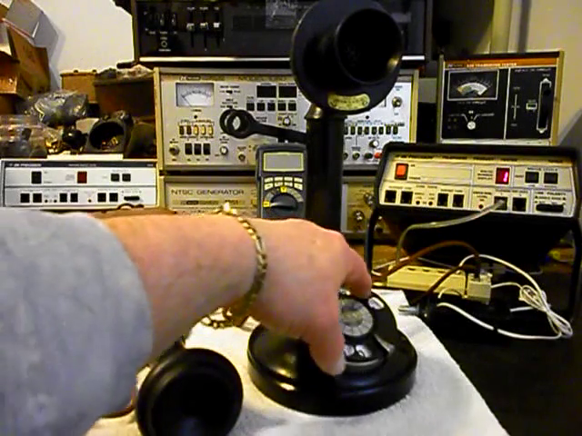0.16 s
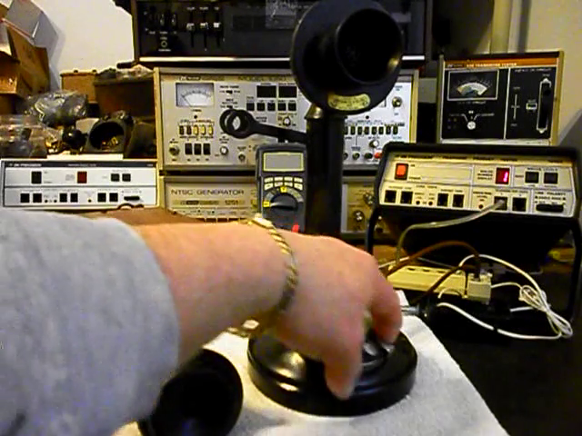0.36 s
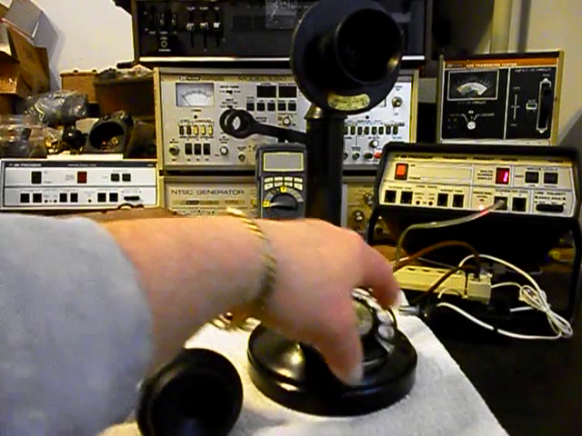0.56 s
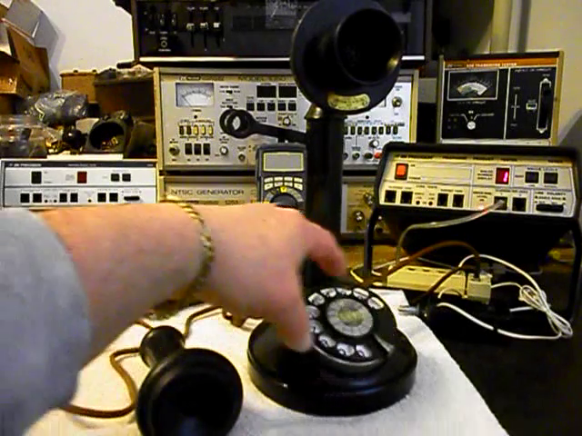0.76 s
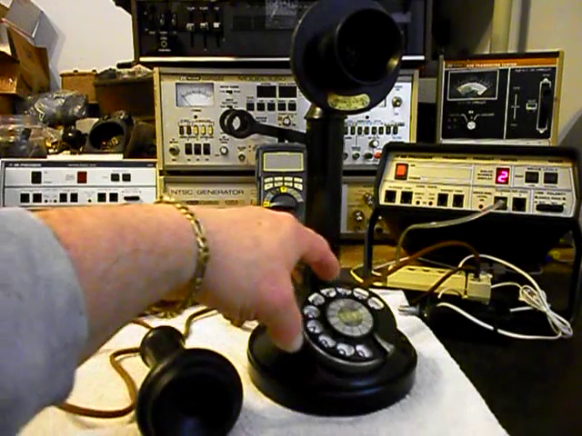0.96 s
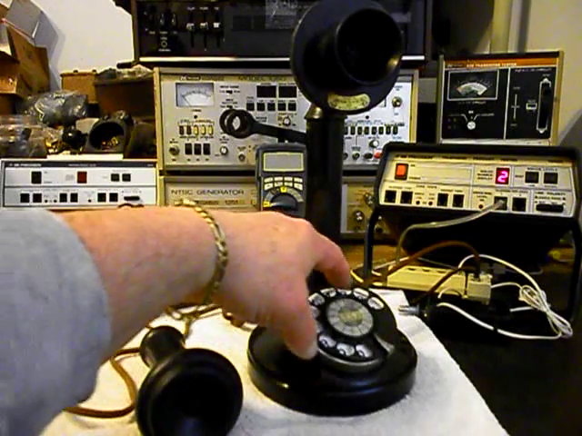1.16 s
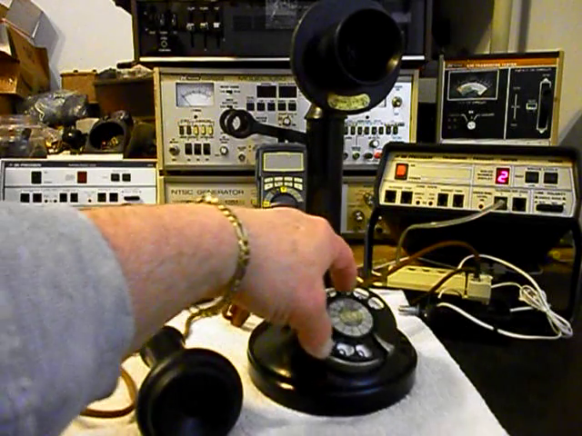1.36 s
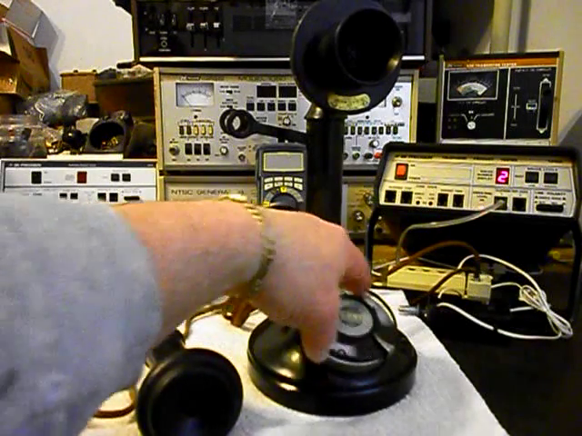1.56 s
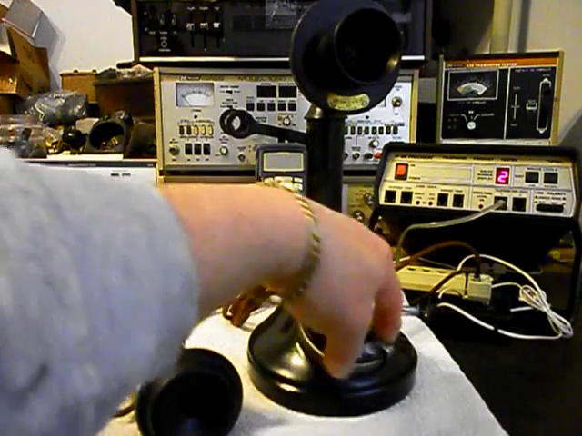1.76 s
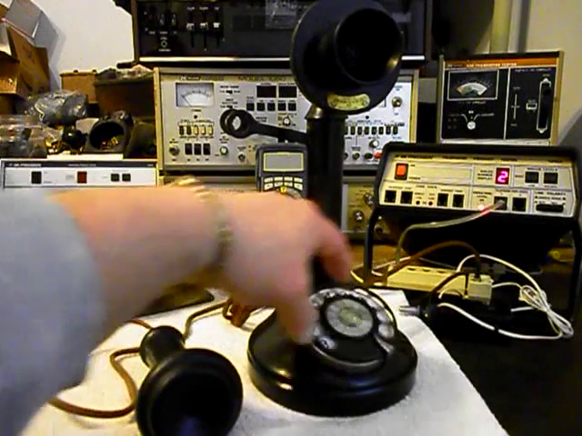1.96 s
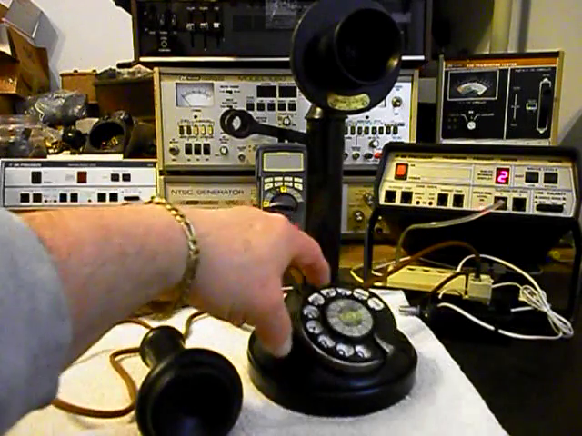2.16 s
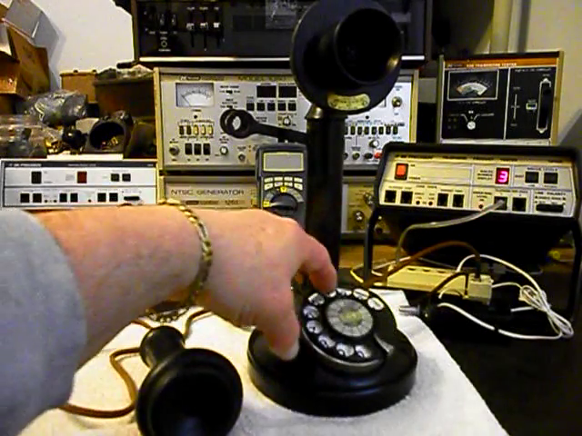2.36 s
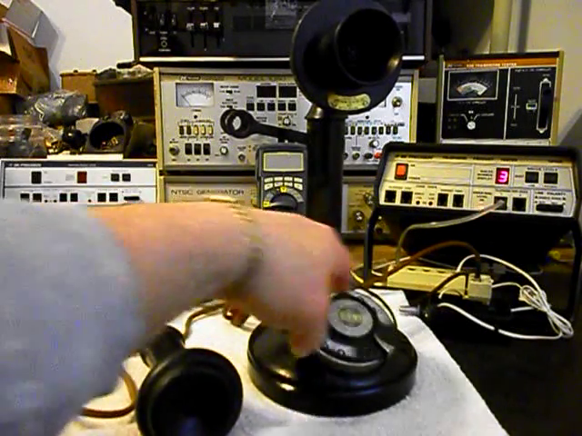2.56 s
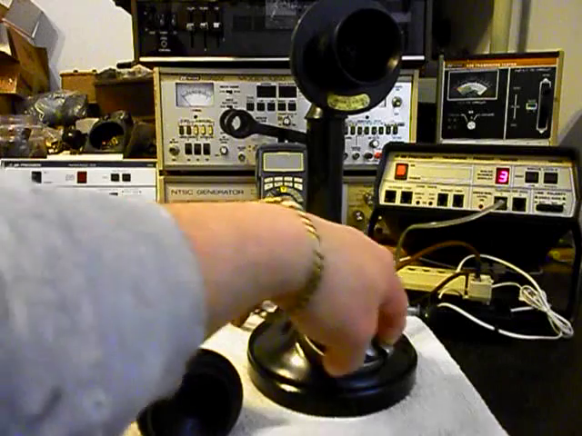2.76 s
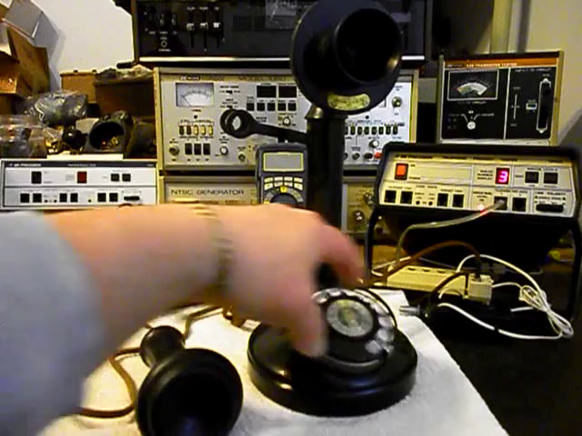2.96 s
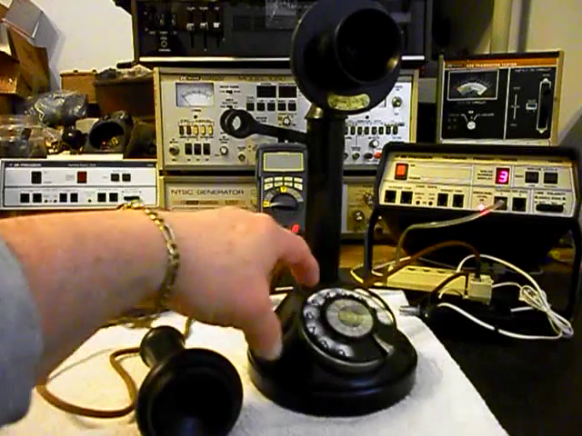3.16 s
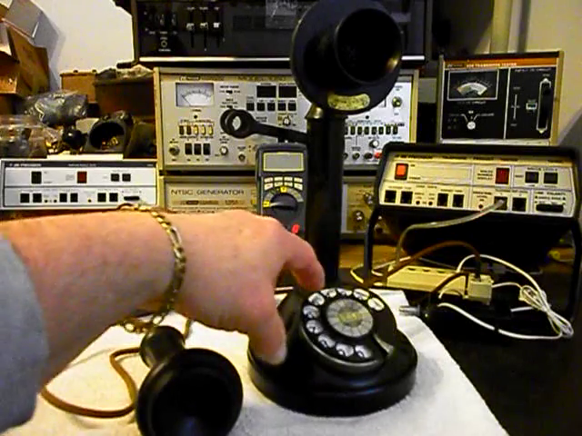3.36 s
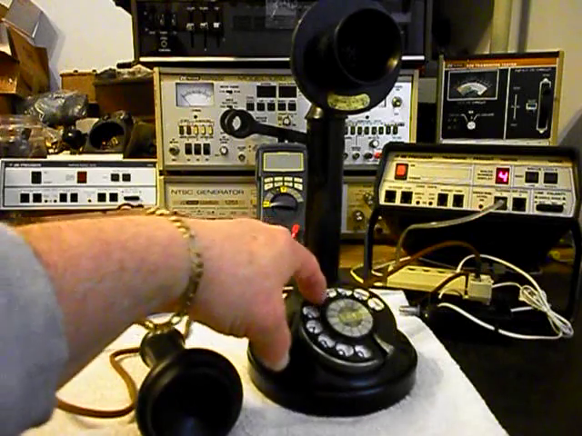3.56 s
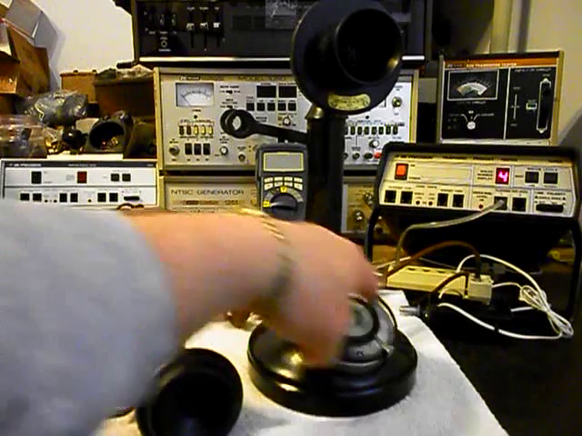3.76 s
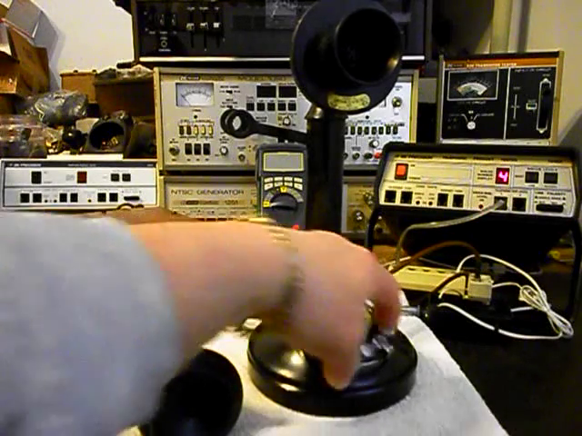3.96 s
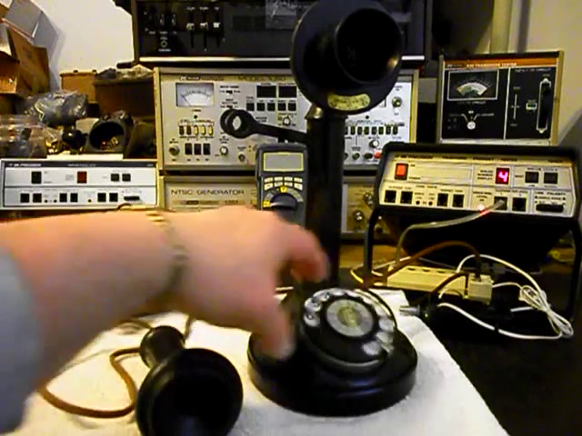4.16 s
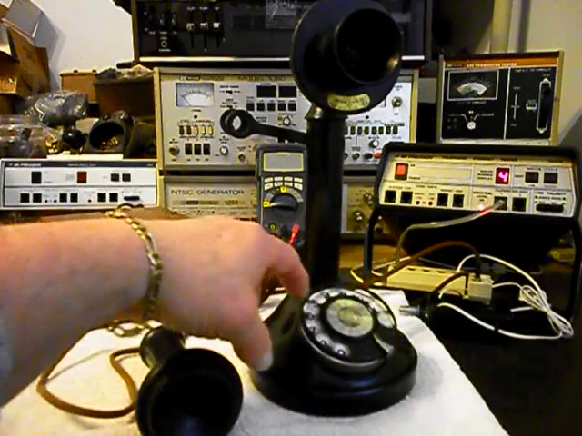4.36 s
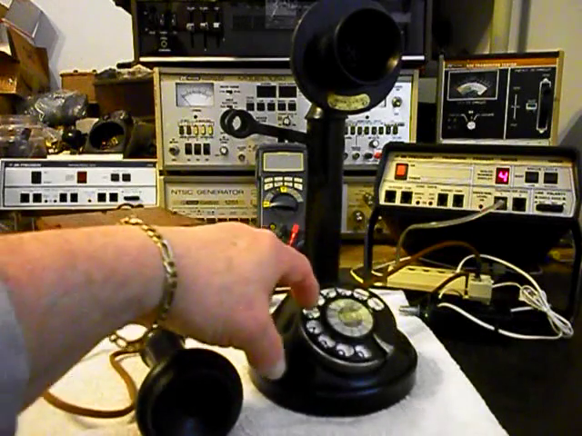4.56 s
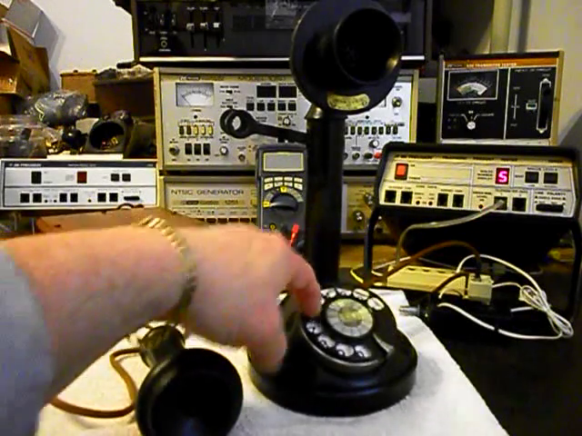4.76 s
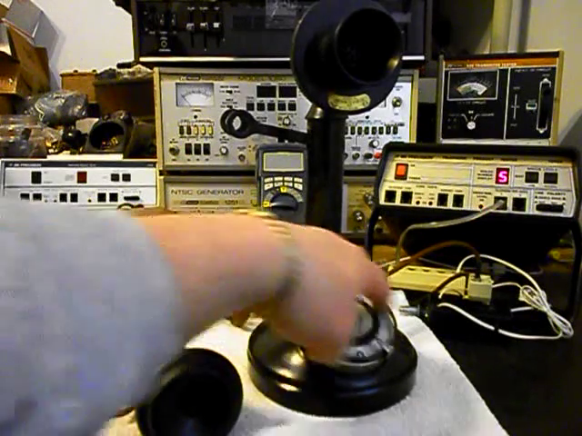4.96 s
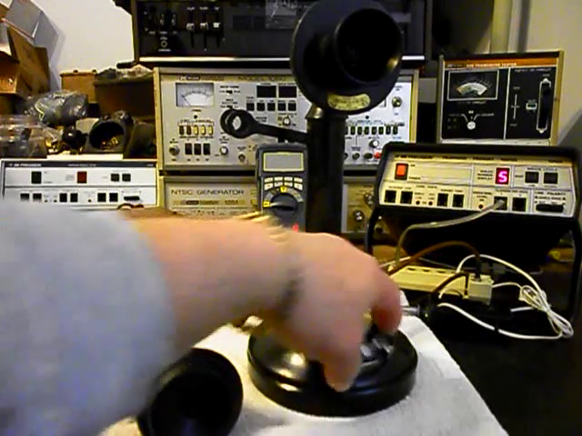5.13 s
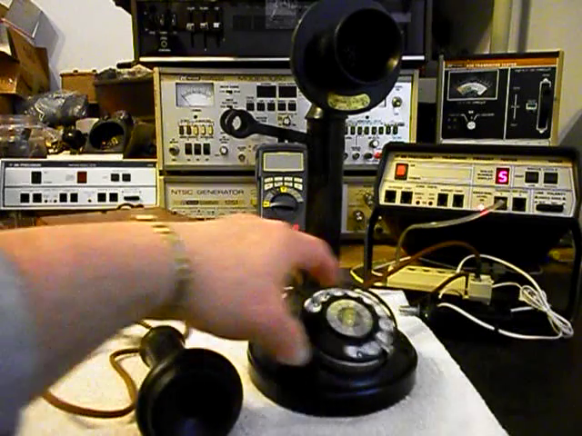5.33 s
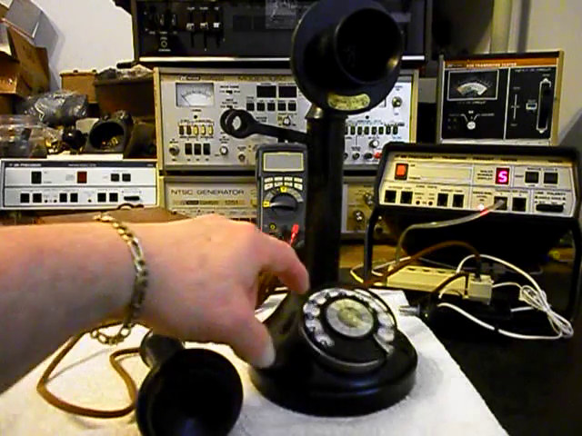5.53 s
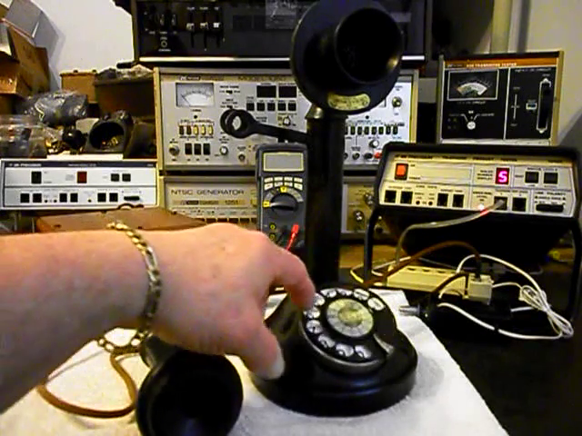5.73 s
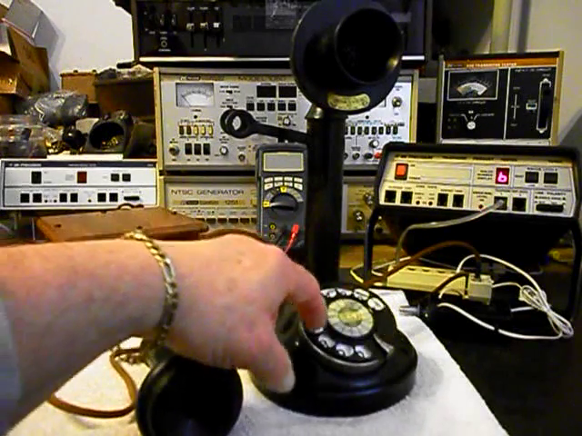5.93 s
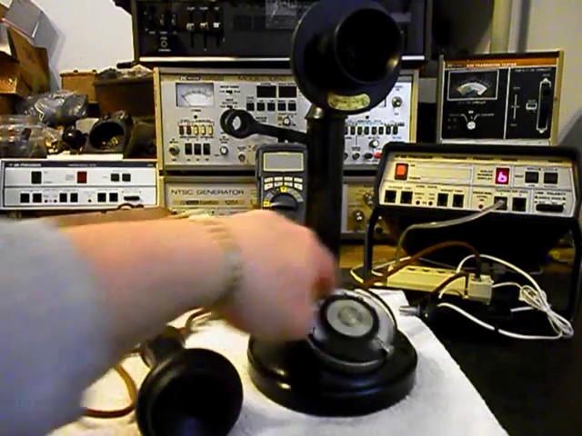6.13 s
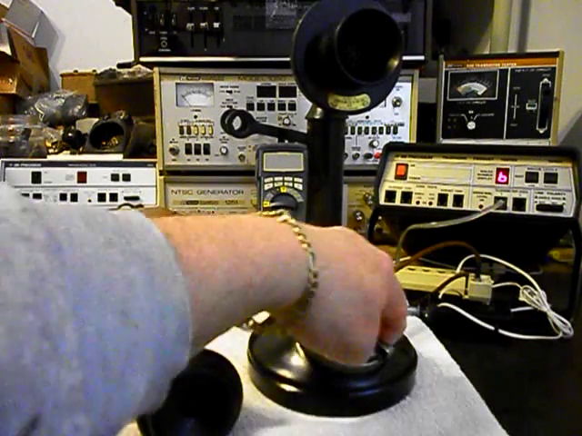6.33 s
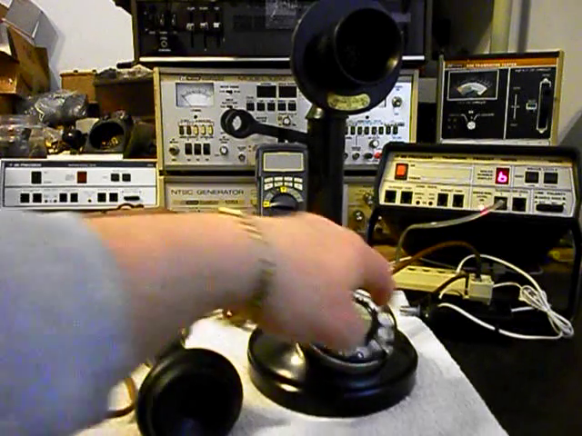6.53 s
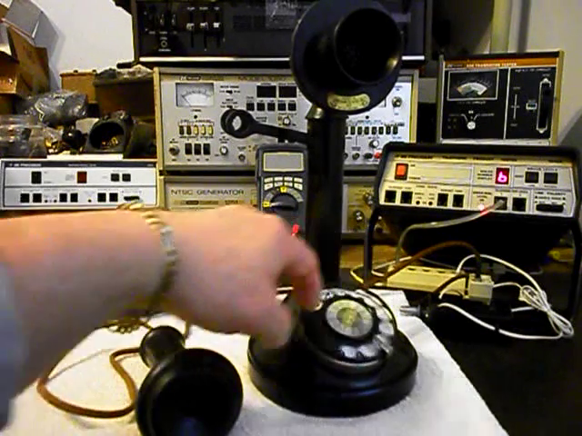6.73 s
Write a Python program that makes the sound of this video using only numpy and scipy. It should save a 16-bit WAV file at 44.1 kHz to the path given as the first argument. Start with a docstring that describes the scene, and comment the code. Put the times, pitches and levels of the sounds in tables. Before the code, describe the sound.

A metal rotary telephone dial is wound with ratchety ticks and released six times, clacking loudly, whirring back and snapping to its stop.

```python
"""A bench in a quiet workshop: a finger winds an old metal telephone dial and lets it run back, six times.
Winding: two contact springs snap as rung impulses, then a pawl ticks over the ratchet as struck plate modes.
Release: a bouncing clack, gears whirring as toothed noise, springs snapping back, the wheel hitting its stop;
the sixth run is still whirring at the end. The hand brushes, knocks and rocks the base; a small camera listens."""
import sys
import numpy as np
from scipy import signal
from scipy.fft import rfft, irfft
from scipy.io import wavfile
from scipy.ndimage import uniform_filter1d

SR = 44100
rng = np.random.default_rng(int(sys.argv[2]) if len(sys.argv) > 2 else 0)


def master_out(mix):
    """Clip the mix to full scale and print it as 16-bit PCM to the path in sys.argv[1]."""
    frames = np.transpose(np.atleast_2d(mix))
    ceiling = np.clip(frames, -1, 1)
    pcm = np.round(ceiling * 32767).astype(np.int16)
    wavfile.write(sys.argv[1], SR, pcm)


def convert_level_to_amplitude(level_db):
    """Map a level in decibels to its linear amplitude factor."""
    exponent = np.asarray(level_db, float) / 20
    return 10 ** exponent


N = 299439  # samples

# room air and hiss, relative spectrum: hz, density_db_per_hz
AIR_SPECTRUM = [(18, -62.5), (30, -25.5), (91, -16.5), (108, -8), (145, -15.5), (175, -9.5), (756, -17.5),
                (1660, -21), (1830, -22), (3040, -25), (7700, -32.5), (10000, -64), (16900, -120)]
# room decay: hz, t60_s
ROOM_DECAY = [(250, 0.6), (1000, 0.39), (3500, 0.46), (7000, 0.32)]
# bench top answering a push of the hand: start_s, peak_db
BENCH_PUSHES = [(0.33, -58), (1.211, -62), (1.644, -68.5), (2.68, -49), (3.799, -62), (5.003, -56.5),
                (5.97, -58), (6.248, -61)]
# low thuds as the recorder overloads: start_s, peak_db
LOW_CLIP_THUDS = [(0.471, -31.5), (1.775, -31.5), (2.699, -35), (3.949, -25.5), (5.963, -44), (6.48, -34)]
# a push rocks the base on its cloth: start_s, length_s, top_db
ROCKING_PUSHES = [(2.705, 0.11, -36.5), (5.05, 0.096, -44.5)]
# base modes: hz, width_hz, relative_db
BASE_MODES = [(306, 53, -1.5), (385, 16, -2), (630, 220, -13.5)]
# hand brushing base and cloth: start_s, length_s, final_db
HAND_BRUSHES = [(0.125, 0.16, -58), (1.199, .36, -58.5), (2.331, 0.27, -56), (3.404, 0.33, -56),
                (4.661, 0.21, -53), (5.925, 0.24, -56)]
# brushing noise colour: hz, relative_db
BRUSH_COLOUR = [(100, -37), (250, 3), (450, -0.5), (700, -5.5), (1100, -13.5), (1600, -16.5), (7500, -42)]
# faint squeaks: start_s, length_s, from_hz, to_hz, top_rms_db
FAINT_SQUEAKS = [(0.92, 0.049, 3000, 3334, -63.5), (3.623, 0.043, 3120, 3450, -58)]
# fingertip or wheel knocking the housing: start_s, peak_db, push_centre_hz
HOUSING_KNOCKS = [(0.254, -41, 1040), (0.345, -31, 635), (1.219, -32, 669), (1.235, -35, 640),
                  (1.33, -38, 740), (1.455, -39, 680), (1.803, -13.5, 673), (2.401, -48, 1018),
                  (2.436, -37, 649), (2.676, -16, 646), (3.464, -44, 673), (3.816, -27, 535),
                  (4.67, -41, 670), (5.011, -25, 664), (5.966, -30.5, 677), (6.336, -16.5, 413),
                  (6.361, -28, 385)]
# dial plate and housing modes: hz, undamped_width_hz, db_over_plain_blow
DIAL_MODES = [(520, 32, -3), (633, 19, 14.5), (1025, 61, 5.5), (1504, 32, 14.5), (1678, 28, 9.5),
              (1740, 58, 1), (1987, 97, 12), (2390, 13, 12), (2951, 91, 11), (3587, 290, 9.5),
              (3955, 130, 4), (4626, 210, 14.5), (4200, 38, -2), (5140, 13, 1.5), (5110, 71, 13),
              (5410, 300, 8), (5810, 150, 2.5), (6280, 78, 10), (6580, 36, -2), (6326, 77, 3),
              (7100, 710, 5.5)]
# contact springs as winding starts: start_s, peak_db, second_delay_ms, second_peak_db
WINDING_SNAPS = [(0.294, -26, 11, -23.5), (1.547, -17, 14, -15), (2.547, -26, 14, -20),
                 (3.654, -17.5, 16, -16), (4.81, -19, 9, -20), (6.096, -19, 6, -19)]
# spring modes ahead of their treble roll-off: hz, width_hz, relative_db
SPRING_MODES = [(1040, 815, -4), (1653, 378, 7.5), (2026, 550, 7), (2394, 670, 2), (3250, 82, -8)]
# spring tip mode: hz, width_hz
SPRING_TIP = (6770, 840)
# gear rubbing colour: hz, relative_db
GEAR_RUB_COLOUR = [(90, -55.5), (200, -19), (650, -7), (1350, -11), (1750, -9.5), (2000, -6.5),
                   (2450, -13.5), (6900, -17)]
# what a gear tooth rings: hz, width_hz, relative_db
GEAR_MODES = [(1972, 140, 1), (2253, 170, -4), (3700, 270, -14.5), (1188, 140, -11.5), (6260, 220, -11.5)]
# pawl dropping over a ratchet tooth: start_s, peak_db, tilt_db_per_octave
PAWL_TICKS = [(0.308, -7, -0.9), (0.329, -7, -1.3), (0.343, -11.5, -4.5), (1.566, -7, -1.7),
              (1.595, -3, -2), (1.62, -13, -2), (1.644, -7, -2.5), (2.565, -9.5, -0.5), (2.61, -8.5, -1.5),
              (2.639, -8, -2.5), (2.654, -9.5, -3), (2.667, -9, -3.5), (3.676, -6, 0.2),
              (3.712, -6.5, -0.5), (3.741, -9, -1.6), (3.765, -9, 0), (3.782, -7.5, -1.5),
              (3.801, -9.5, -1.8), (4.823, -8, -1.5), (4.856, -4.5, 0.7), (4.888, -9, -0.9), (4.92, -8, 1),
              (4.947, -9, -2), (4.972, -12, -2.5), (4.999, -12, -0.2), (6.107, -5, 0.3),
              (6.13, -10.5, -1.5), (6.164, -7, -0.2), (6.2, -7.5, -0.3), (6.233, -8.5, -1.3),
              (6.269, -14, -3), (6.29, -18.5, -3.5), (6.298, -9, -2.5), (6.321, -10.5, -3)]
# slack taken up on release, and its bounce: start_s, peak_db, tilt_db_per_octave, bounce_delay_ms, bounce_peak_db
RELEASE_CLACKS = [(0.469, 1, -1.1, 21.2, -2.5), (1.775, 3.5, 0.65, 24.7, -1.5),
                  (2.813, 2.5, -0.86, 18.2, -3), (3.944, 3.5, -1, 18, -3), (5.148, 0.5, -1.75, 14, -5.5),
                  (6.479, 1.5, -1.1, 14.3, -2)]
# bounces after the first bounce: delay_ms, relative_db, tilt_db_per_octave
LATER_BOUNCES = [(12.45, -12, -3), (23.27, -10.5, -0.5)]
# wheel coming home: first_snap_s, snap_peak_db, stop_peak_db, housing_knock_peak_db
WHEEL_STOPS = [(0.65, -6.5, -16, -31), (2.041, -5.5, -17.5, -19), (3.159, -5, -15.5, -26.5),
               (4.377, -3.5, -14, -23), (5.658, -4, -13.5, -26.5)]
# how each kind of blow drives the plate: hz, relative_db
TICK_COLOUR = [(120, -51), (250, -15.5), (950, -5), (1400, -9.5), (1900, -6), (2400, -9.5), (3000, -8.5),
               (6000, -7.5), (7100, -3.5)]
CLACK_COLOUR = [(120, -58), (300, -14.5), (450, -10.5), (650, -10.5), (1300, -11.5), (1900, -6.5),
                (2500, -7.5), (3900, -11), (6900, -11)]
STOP_COLOUR = [(120, -51), (250, -3), (1000, -3.5), (1400, -3.5), (4600, -3.5), (6600, 0.5), (7600, -16)]
# one needle-sharp digital tick: time_s, sample_db
DIGITAL_TICK = (5.1687, -18)

STOP_DELAY_MS = 89.3  # first returning snap to landing


def evened(x):
    """Scales to unit rms."""
    return x / np.sqrt(np.mean(x ** 2) + 1e-20)


def read(points, hz):
    """Joins (hz, value) points on a log axis."""
    f, value = np.transpose(points)
    return np.interp(np.log(hz + 1), np.log(f + 1), value)


def add(mix, start_s, sound):
    """Mixes a sound in at its start."""
    part = mix[round(start_s * SR):][:len(sound)]
    part += sound[:len(part)]


def add_peaked(mix, start_s, peak_db, sound):
    """Scales a sound to its peak level and mixes it in."""
    add(mix, start_s, convert_level_to_amplitude(peak_db) * sound / abs(sound).max())


def filtered(x, response):
    """Applies a response sampled on 2 * len(x) points."""
    return irfft(rfft(x, 2 * len(x)) * response)[:len(x)]


def modes(table, hz):
    """Sums damped resonances, neighbours in opposite phase."""
    total = 0
    for k, (mode_hz, width_hz, db) in enumerate(table):
        damping = 1j * hz * width_hz
        total = total + (-1) ** k * convert_level_to_amplitude(db) * damping / (mode_hz ** 2 - hz ** 2 + damping)
    return total


def causal(db):
    """Minimum-phase response for a gain in dB."""
    log_gain = np.log(convert_level_to_amplitude(np.concatenate([db, db[-2:0:-1]])))
    return np.exp(np.conj(signal.hilbert(log_gain)))[:len(db)]


def delayed(hz, delay_s):
    """Response of a pure delay."""
    return np.exp(-2j * np.pi * hz * delay_s)


def span(length_s):
    """Time from the start of a sound, and a soft-edged window."""
    t = np.arange(0, length_s, 1 / SR)
    return t, signal.windows.tukey(len(t), min(1, 0.02 / length_s))


def air():
    """Room air and microphone hiss as shaped noise, drifting least in the treble."""
    frames, hz = N // 256 + 5, np.fft.rfftfreq(1024, 1 / SR)
    a, b, patches = rng.standard_normal((frames, 513, 3)).T
    patches = evened(uniform_filter1d(uniform_filter1d(patches, 8, 0), 14, 1))
    drift_db = read([(60, 2.4), (700, 2.9), (4000, 1.3)], hz)[:, None] * patches
    z = (a + 1j * b) * convert_level_to_amplitude(read(AIR_SPECTRUM, hz)[:, None] + drift_db)
    noise = signal.istft(z, nperseg=1024, noverlap=768)[1][:N]
    return convert_level_to_amplitude(-59.5) * evened(noise)


def room(x):
    """Dense reflections, each band dying at its own speed; three tails take turns so that like blows differ."""
    out, turn = np.zeros(N), 2 * np.pi * 7 * np.arange(N) / SR
    for k in range(3):
        build_up = np.minimum(np.arange(SR // 2) / 250, 1)
        taps = rng.standard_normal(SR // 2) * build_up
        hz, t, z = signal.stft(taps, SR, nperseg=256)
        decay = convert_level_to_amplitude(-60 * t / read(ROOM_DECAY, hz)[:, None])
        tail = signal.istft(z * decay, SR, nperseg=256)[1]
        share = np.sqrt(2 / 3) * np.cos(turn + k * np.pi / 3)
        out += signal.oaconvolve(x * share, tail / np.linalg.norm(tail))[:N]
    return out


def add_bench(mix, released_s, landed_s):
    """The bench top swells and dies at its low note after pushes, releases and landings."""
    bench_hz, swell_ms = 80, 38
    release_delay_ms, release_db = 25, -59
    landing_delay_ms, landing_db = 11, -62.5
    table = BENCH_PUSHES + [(s + release_delay_ms / 1000, release_db) for s in released_s]
    table = table + [(s + landing_delay_ms / 1000, landing_db) for s in landed_s]
    t = np.arange(SR // 2) / SR
    u = t * 1000 / swell_ms
    swell = (u * np.exp(1 - u)) ** 2
    for start_s, peak_db in table:
        add(mix, start_s, convert_level_to_amplitude(peak_db) * swell * np.sin(2 * np.pi * (bench_hz * t + rng.random())))


def add_clip_thuds(mix):
    """Uneven clipping of a loud sound leaves a low thud, drawn as one smooth pulse."""
    for start_s, peak_db in LOW_CLIP_THUDS:
        add(mix, start_s, convert_level_to_amplitude(peak_db) * signal.windows.hann(90))


def rocking(length_s, top_db):
    """The base bounces on its cloth at a wavering low note while scuffs excite its higher modes."""
    mean_hz, rise_s, fade_db, scuffs_per_s = 171, 0.017, -14.5, 700
    t, edge = span(length_s)
    n = len(t)
    db = top_db + np.interp(t, [0, rise_s, length_s], [-10, 0, fade_db])
    scuffs = rng.standard_normal(n) * (rng.random(n) < scuffs_per_s / SR)
    shell = filtered(scuffs, modes(BASE_MODES, np.fft.rfftfreq(2 * n, 1 / SR)))
    waver = 1 + 0.03 * evened(uniform_filter1d(rng.standard_normal(n), 900))
    bounce = np.sin(2 * np.pi * np.cumsum(mean_hz * waver) / SR) * np.exp(-t / 0.05)
    return convert_level_to_amplitude(db) * edge * (evened(bounce) + evened(shell))


def brushing(length_s, final_db):
    """Grainy skin friction through the housing, growing as the finger settles in its hole."""
    swell_db = 10.5
    t, edge = span(length_s)
    n, db = len(t), final_db - swell_db * (1 - t / length_s)
    a, b = rng.standard_normal((2, n))
    hz = np.fft.rfftfreq(n, 1 / SR)
    grains = a * convert_level_to_amplitude(1.6 * evened(uniform_filter1d(b, 500)))
    housing = convert_level_to_amplitude(read(BRUSH_COLOUR, hz)) * (1 + modes(DIAL_MODES, hz))
    return convert_level_to_amplitude(db) * edge * evened(irfft(rfft(grains) * housing, n))


def squeak(length_s, from_hz, to_hz, top_rms_db):
    """A thin tone that glides up, quickly at first."""
    glide_s = 0.035
    t, _ = span(length_s)
    hz = from_hz + (to_hz - from_hz) * np.sin(np.minimum(t / glide_s, 1) * np.pi / 2)
    swell = np.sin(np.pi * t / length_s)
    return np.sqrt(2) * convert_level_to_amplitude(top_rms_db) * swell * np.sin(2 * np.pi * np.cumsum(hz) / SR)


def add_knocks(mix, landed_s):
    """A soft double push rings touch-damped housing modes near its pitch, with a faint tick on top."""
    early_ms, rim_hz = 5, 1020  # the wheel rim knocks the housing just before it lands
    rim = [(s - early_ms / 1000, row[3], rim_hz) for s, row in zip(landed_s, WHEEL_STOPS)]
    hz = np.fft.rfftfreq(4096, 1 / SR)
    housing = 1 + modes(np.array(DIAL_MODES) * [1, 1.8, 1], hz)  # touch widens the modes
    for start_s, peak_db, centre_hz in HOUSING_KNOCKS + rim:
        tick_db = np.where(hz > centre_hz, -27, -60)
        push_db = np.maximum(-22 * np.log2((hz + 30) / centre_hz) ** 2, tick_db)
        again = 1 + 0.66 * delayed(hz, rng.uniform(0.003, 0.0087))
        add_peaked(mix, start_s, peak_db, irfft(causal(push_db) * again * housing))


def snap_rows():
    """Both springs snap as winding starts and again as the wheel comes home."""
    follow_ms, follow_db = 31.3, -2  # second spring on the way back
    rows = []
    for start_s, db, delay_ms, second_db in WINDING_SNAPS:
        rows += [(start_s, db), (start_s + delay_ms / 1000, second_db)]
    for start_s, db, _, _ in WHEEL_STOPS:
        rows += [(start_s, db), (start_s + follow_ms / 1000, db + follow_db)]
    return rows


def add_snaps(mix):
    """A clean impulse rings the spring; a few ms later the shock comes back out of the plate."""
    return_s, return_db, tip_db, tip_db_per_db = 0.003244, -11.5, -10, -0.23
    hz = np.fft.rfftfreq(4096, 1 / SR)
    for start_s, peak_db in snap_rows():
        detune = 1 + 0.013 * rng.standard_normal()
        spring = modes(SPRING_MODES, hz * detune) / (1 + 1j * hz / 3500) ** 2
        back = convert_level_to_amplitude(return_db) * delayed(hz, return_s) * (1 + convert_level_to_amplitude(-5.5) * modes(DIAL_MODES, hz))
        # soft snaps sound tinnier
        tip = convert_level_to_amplitude(tip_db + tip_db_per_db * peak_db) * modes([(*SPRING_TIP, 0)], hz) ** 2
        add_peaked(mix, start_s, peak_db, irfft(spring * (1 + back) + tip))


def whir(length_s):
    """Uneven gear teeth ring the gear train over the rubbing of the governor in the plate."""
    spin_up_s, mean_teeth_per_s = 0.13, 105
    rest_db, full_db = -45, -38
    teeth_rest_db, teeth_full_db = -15, -2.5  # teeth over rubbing
    t, edge = span(length_s)
    n, slack = len(t), np.exp(-t / spin_up_s)
    db = full_db + (rest_db - full_db) * slack
    teeth_db = teeth_full_db + (teeth_rest_db - teeth_full_db) * slack
    uneven = 1 + 0.68 * uniform_filter1d(rng.standard_normal(n), 300)
    teeth = np.cumsum(mean_teeth_per_s * uneven) / SR + 3 * rng.random()
    tooth = teeth.astype(int)
    spread_db = 2.2 * rng.standard_normal(tooth[-1] + 1)[tooth]
    weight = convert_level_to_amplitude(spread_db + 4 * (tooth % 3 == 0))  # every third tooth lands harder
    mesh = weight * np.exp(-(teeth % 1) / 0.26)
    a, b = rng.standard_normal((2, n))
    hz = np.fft.rfftfreq(2 * n, 1 / SR)
    plate = causal(read(GEAR_RUB_COLOUR, hz)) * (1 + convert_level_to_amplitude(-9) * modes(DIAL_MODES, hz))
    rub = filtered(a * (3.7 + mesh), plate)
    knock = filtered(b * mesh ** 1.05, modes(GEAR_MODES, hz))
    return convert_level_to_amplitude(db) * edge * (evened(rub) + convert_level_to_amplitude(teeth_db) * evened(knock))


def clack_rows():
    """Every release: the blow, its first bounce and the later ones."""
    bounce_tilt_db_per_octave = 0.2  # over the blow's
    rows = []
    for start_s, db, tilt, gap_ms, bounce_db in RELEASE_CLACKS:
        bounce_s = start_s + gap_ms / 1000
        rows += [(start_s, db, tilt), (bounce_s, bounce_db, tilt + bounce_tilt_db_per_octave)]
        for delay_ms, relative_db, late_tilt in LATER_BOUNCES:
            rows.append((bounce_s + delay_ms / 1000, bounce_db + relative_db, late_tilt))
    return rows


def struck_plate(hz, ring_db):
    """Plate response for one blow: mode levels and pitches vary at random from blow to blow."""
    level_db = 1.8 * rng.standard_normal(len(DIAL_MODES))
    detune = 1 + 0.008 * rng.standard_normal(len(DIAL_MODES))
    table = []
    for (mode_hz, width_hz, db), ratio, extra_db in zip(DIAL_MODES, detune, level_db):
        table.append((mode_hz * ratio, 1.56 * width_hz, db + extra_db + ring_db))
    return 1.5 + modes(table, hz)


def add_blows(mix, table, colour, strike_db, grit_db, length_ms, lead_ms, ring_db):
    """Each blow scrapes in, strikes once and rattles out; the striker's colour rings the plate."""
    hz, ms = np.fft.rfftfreq(8192, 1 / SR), np.arange(8192) * 1000 / SR
    scrape = 0.51 * np.sqrt(ms / lead_ms)
    decay = np.exp(-np.maximum(ms - lead_ms, 0) / length_ms)
    shape = np.where(ms < lead_ms, scrape, decay)
    for start_s, peak_db, tilt in table:
        plate = struck_plate(hz, ring_db)
        a, b = rng.standard_normal((2, 8192))
        rattle = a * convert_level_to_amplitude(grit_db * b) * shape
        blow = rfft(rattle / np.linalg.norm(rattle)) + convert_level_to_amplitude(strike_db) * delayed(hz, lead_ms / 1000)
        # even out the noise burst's spectrum, so the striker's colour shapes the blow
        blow /= np.sqrt(uniform_filter1d(abs(blow) ** 2, size=60))
        striker = causal(read(colour, hz) + tilt * np.log2((hz + 200) / 2000))
        add_peaked(mix, start_s, peak_db, irfft(blow * striker * plate)[:6000])


def scene():
    """Dial, hand, bench and room."""
    dial, snaps, low = np.zeros((3, N))
    released_s = [row[0] for row in RELEASE_CLACKS]
    landed_s = [row[0] + STOP_DELAY_MS / 1000 for row in WHEEL_STOPS]
    add_bench(low, released_s, landed_s)
    add_clip_thuds(low)
    for mix, source, table in ((low, rocking, ROCKING_PUSHES), (dial, brushing, HAND_BRUSHES),
                               (dial, squeak, FAINT_SQUEAKS)):
        for start_s, *settings in table:
            add(mix, start_s, source(*settings))
    add_knocks(dial, landed_s)
    add_snaps(snaps)
    whir_delay_s = 0.011
    for start_s, end_s in zip(released_s, landed_s + [N / SR - whir_delay_s]):
        add(dial, start_s + whir_delay_s, whir(end_s - start_s))
    stops = [(s, row[2], 0.61) for s, row in zip(landed_s, WHEEL_STOPS)]  # tilt in dB per octave
    add_blows(dial, PAWL_TICKS, TICK_COLOUR,
              strike_db=-4, grit_db=3.5, length_ms=2.7, lead_ms=0.4, ring_db=-1.5)
    add_blows(dial, clack_rows(), CLACK_COLOUR,
              strike_db=-3.5, grit_db=4.5, length_ms=2.1, lead_ms=2.6, ring_db=-0.5)
    add_blows(dial, stops, STOP_COLOUR,
              strike_db=-7, grit_db=2.5, length_ms=4.2, lead_ms=0.62, ring_db=-6)
    reflections = convert_level_to_amplitude(-9) * room(dial + convert_level_to_amplitude(-9.5) * snaps)
    return (dial + snaps + low + reflections + air())[None]


def band_limit(x):
    """A steep low-pass at the top of the band."""
    return signal.sosfilt(signal.butter(12, 15800, fs=SR, output="sos"), x)


def record(dry):
    """The loudest peaks clip; low-rate sampling cuts the treble and leaves a weak mirror image above half the rate."""
    sampling_hz = 16000
    hz = np.fft.rfftfreq(N, 1 / SR)
    mic_db = np.interp(hz, [30, 70, 7250, 7600, 7900, 8050], [-4.5, -0.5, 3, -6.5, -26, -70])
    heard = irfft(rfft(dry) * convert_level_to_amplitude(mic_db), N)
    clipped = np.clip(heard, -0.8, 0.85)
    cut = irfft(rfft(clipped) * (hz < sampling_hz / 2), N)
    mirrored = 2 * cut * np.cos(2 * np.pi * sampling_hz * np.arange(N) / SR)
    image_db = np.interp(hz, [7900, 7970, 8300, 8804, 9430, 9940], [-103.5, -11.5, -7.5, -21.5, -53.5, -88.5])
    out = cut + irfft(rfft(mirrored) * convert_level_to_amplitude(image_db), N)
    tick_s, tick_db = DIGITAL_TICK
    out[:, round(tick_s * SR)] += convert_level_to_amplitude(tick_db)
    return band_limit(out)


dry = scene()
out = record(dry)
master_out(out)
```